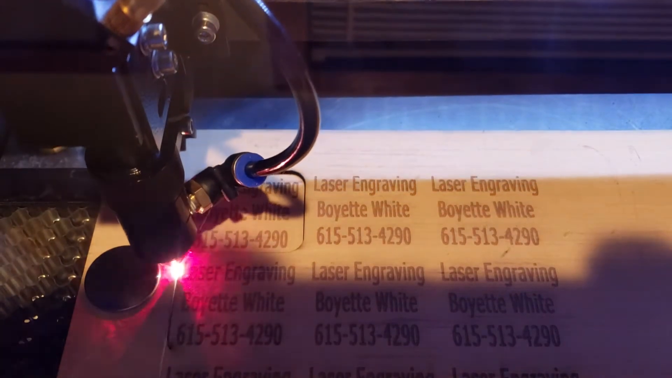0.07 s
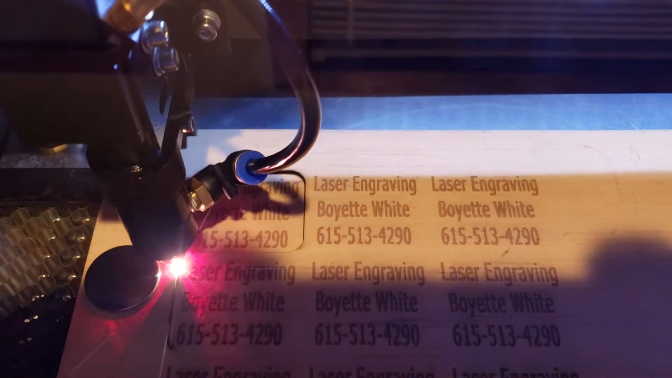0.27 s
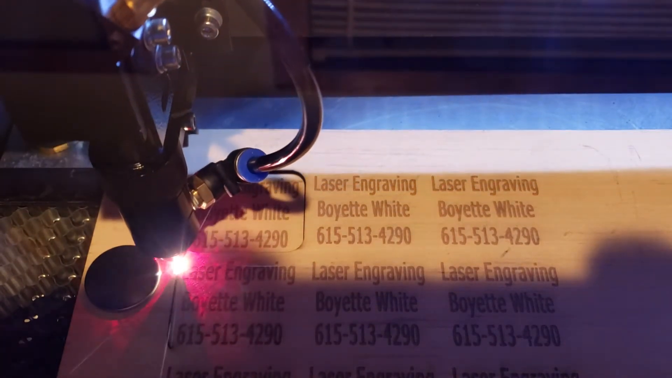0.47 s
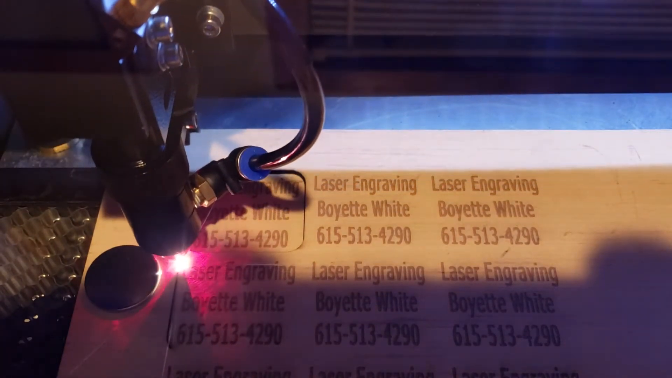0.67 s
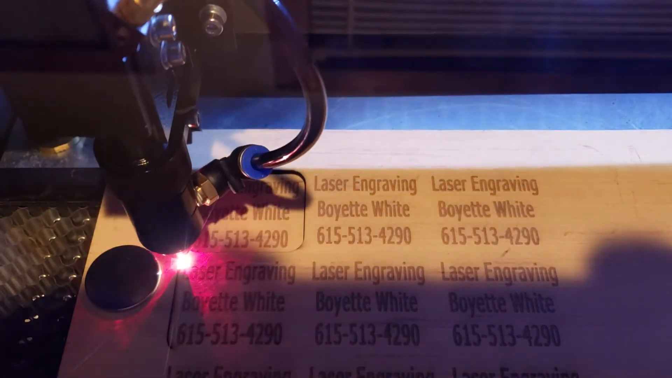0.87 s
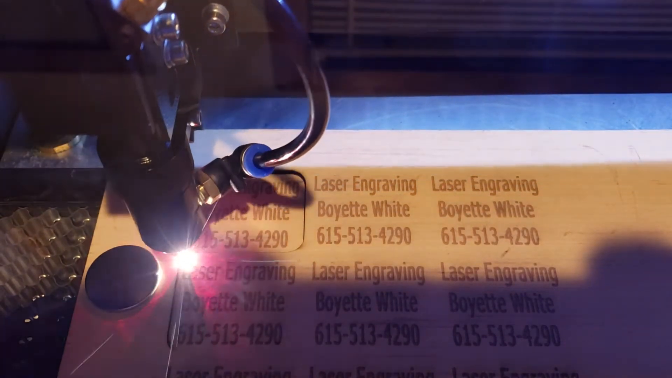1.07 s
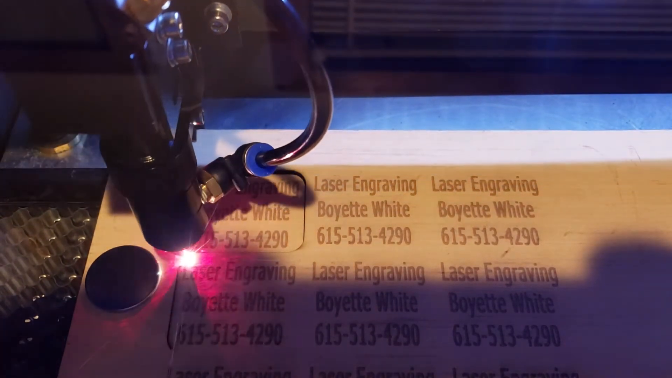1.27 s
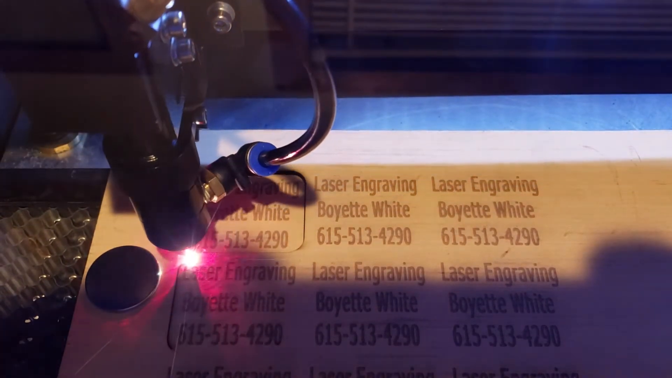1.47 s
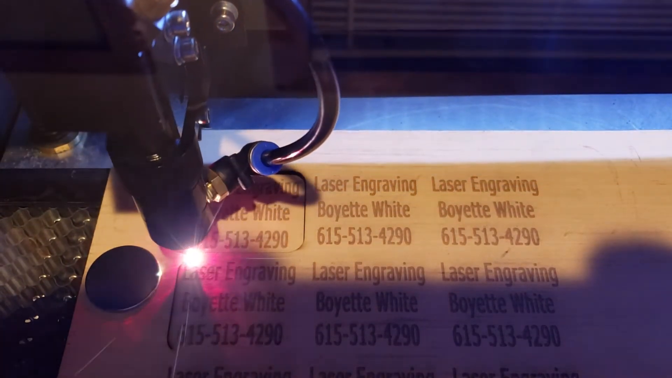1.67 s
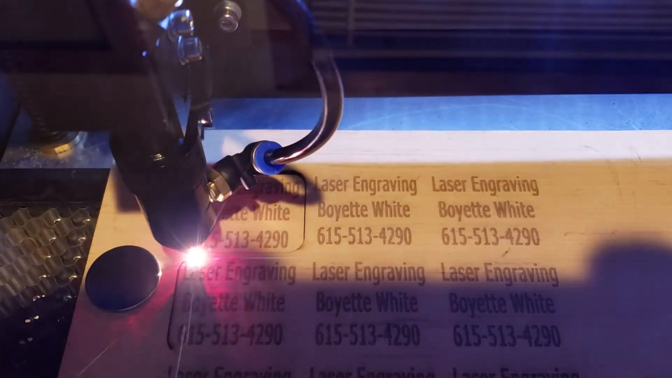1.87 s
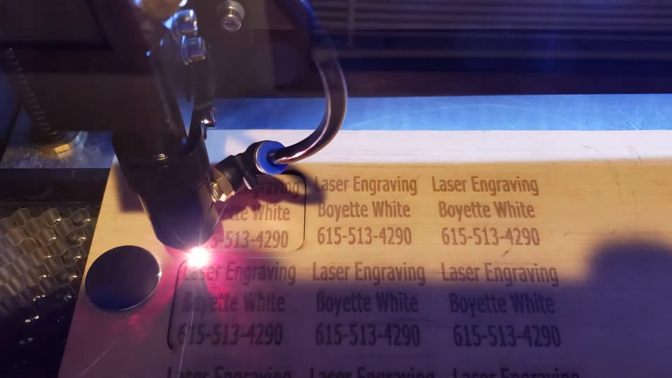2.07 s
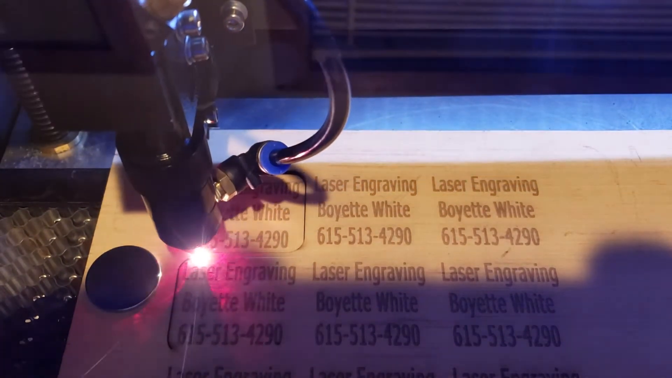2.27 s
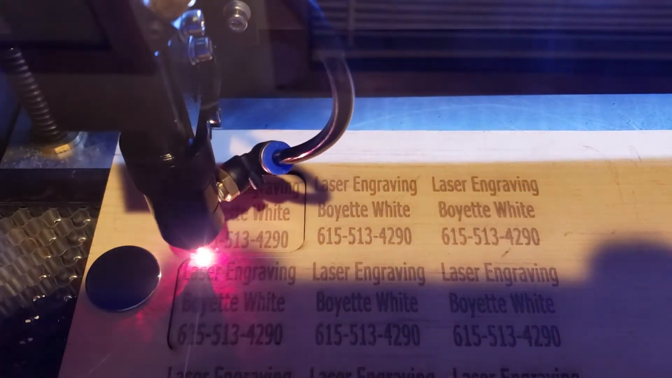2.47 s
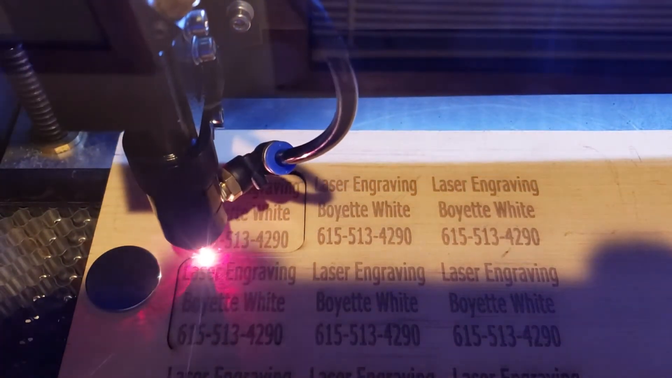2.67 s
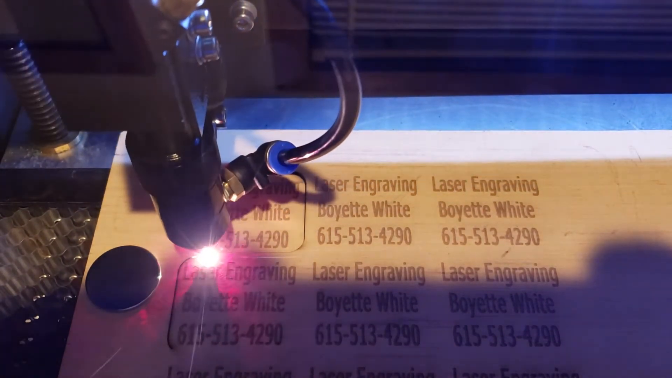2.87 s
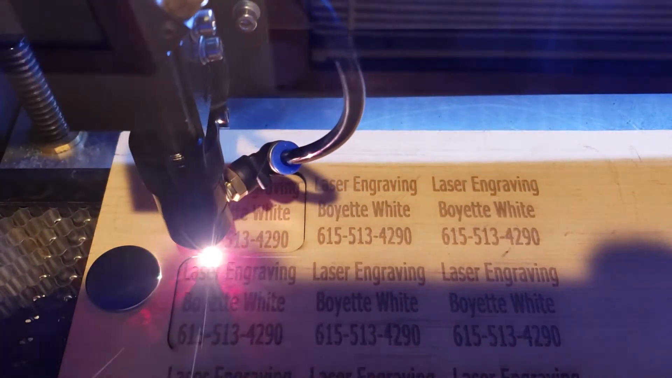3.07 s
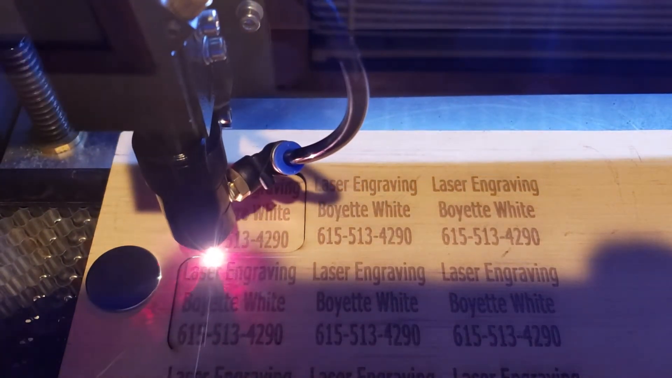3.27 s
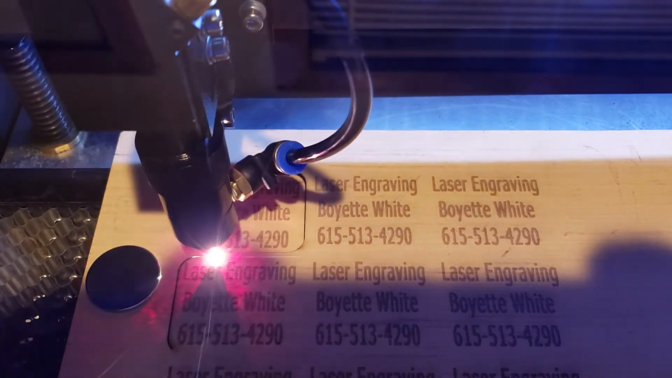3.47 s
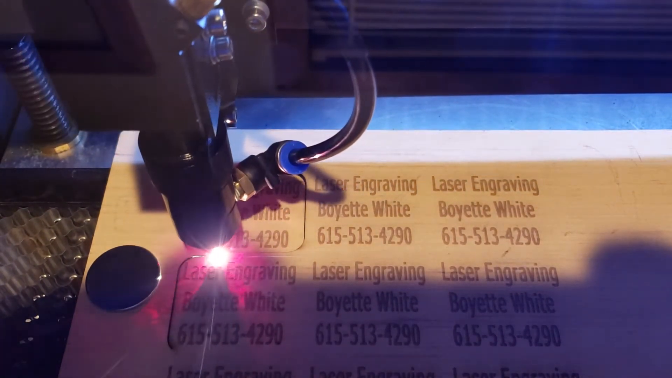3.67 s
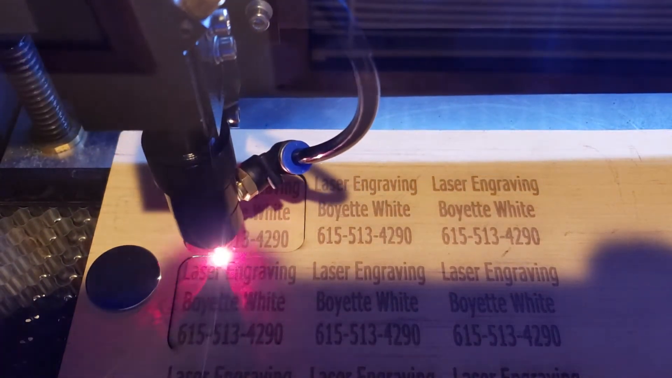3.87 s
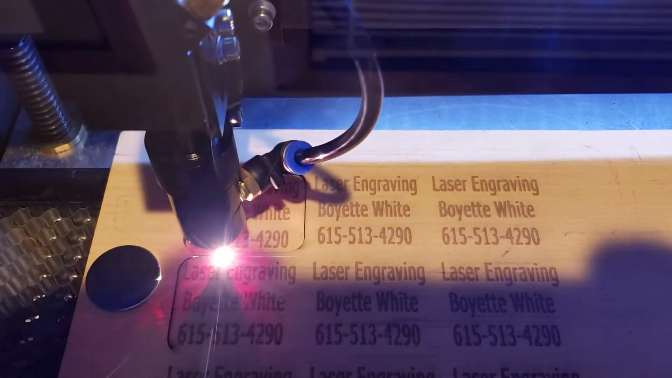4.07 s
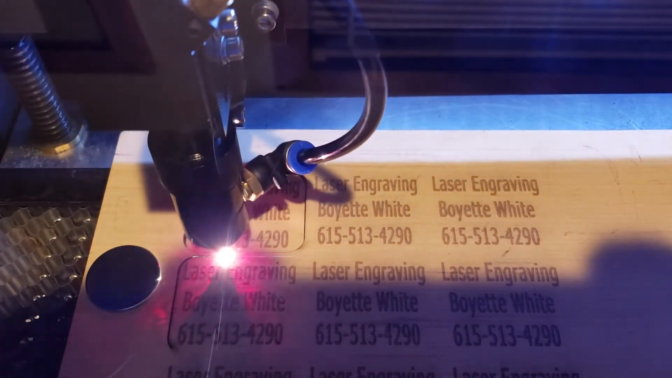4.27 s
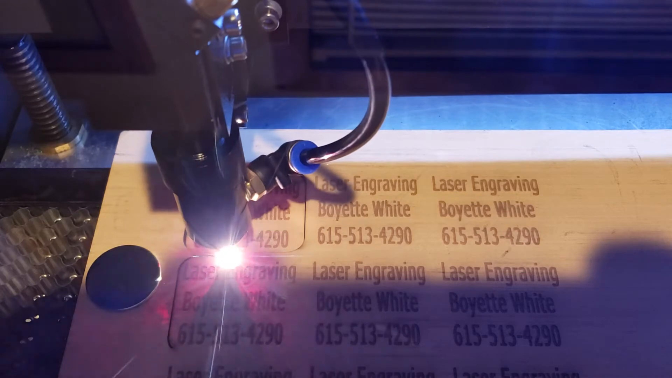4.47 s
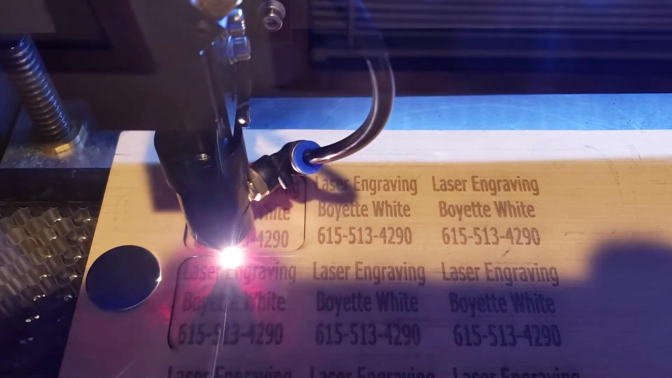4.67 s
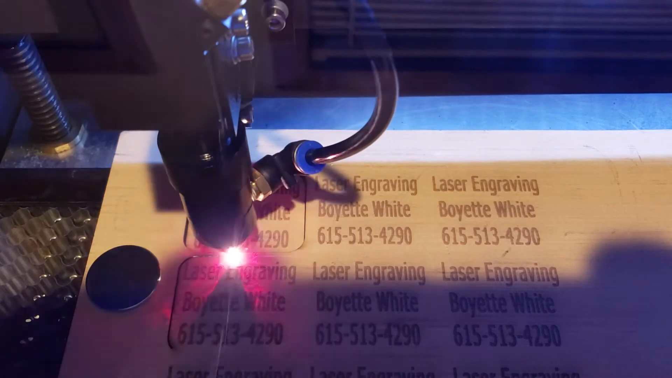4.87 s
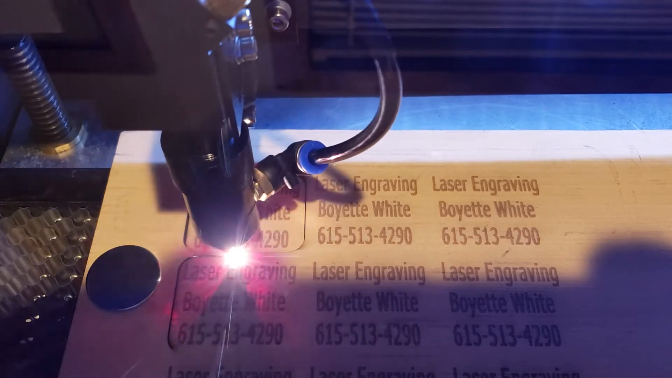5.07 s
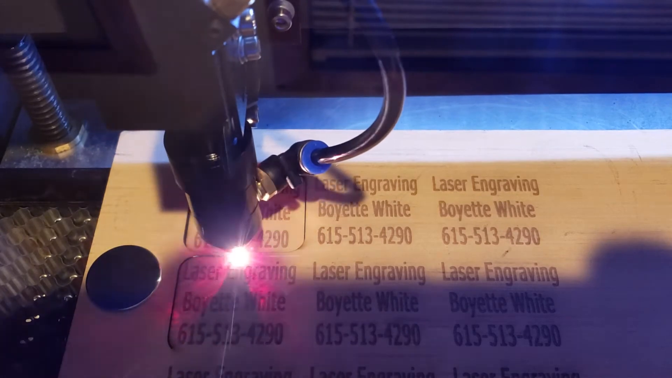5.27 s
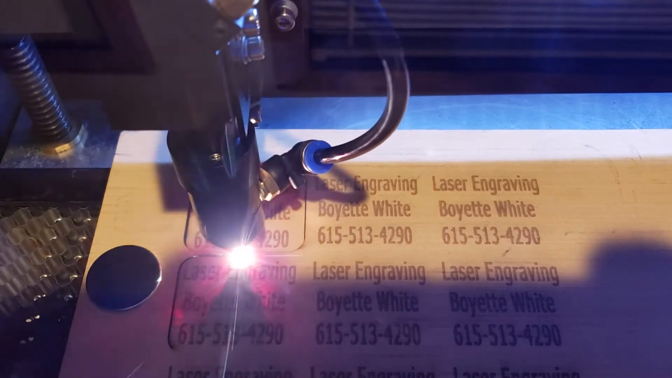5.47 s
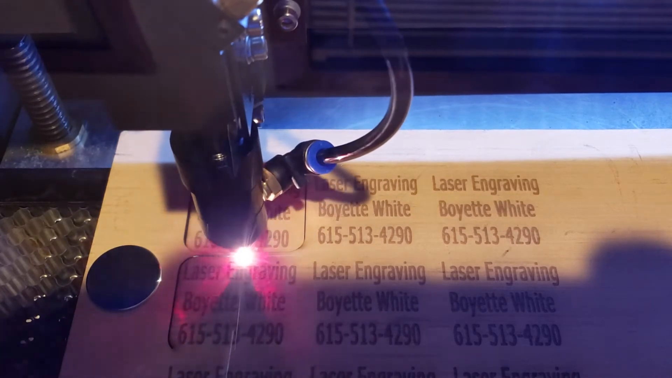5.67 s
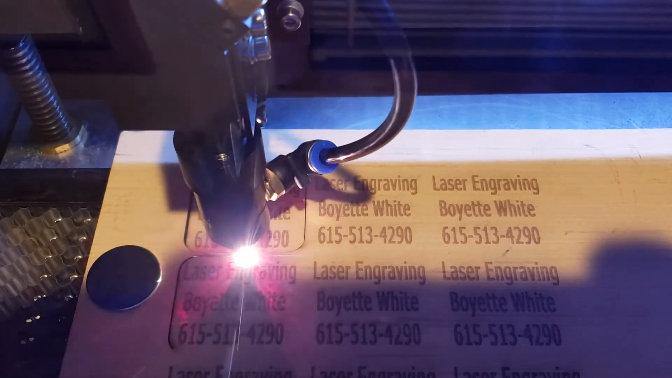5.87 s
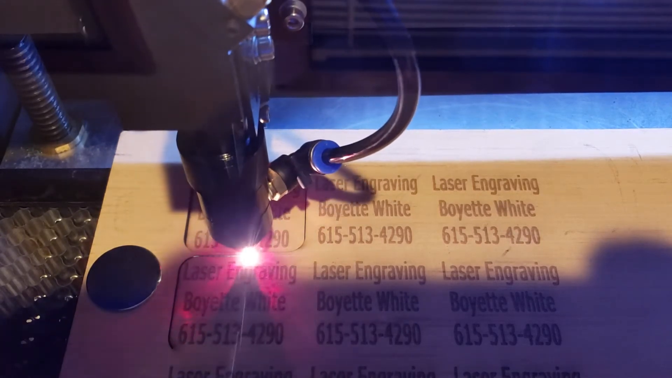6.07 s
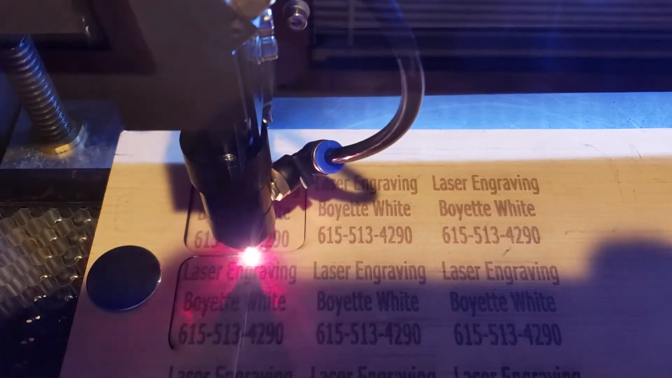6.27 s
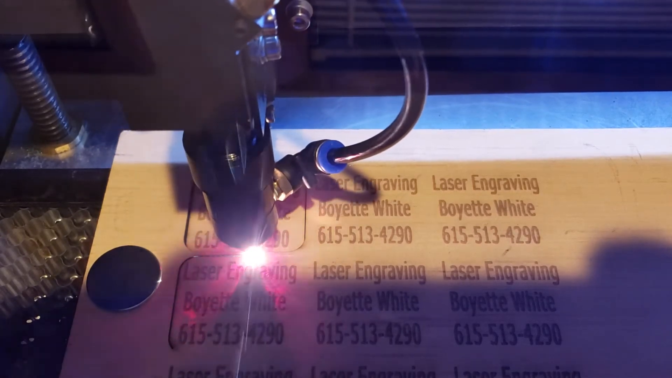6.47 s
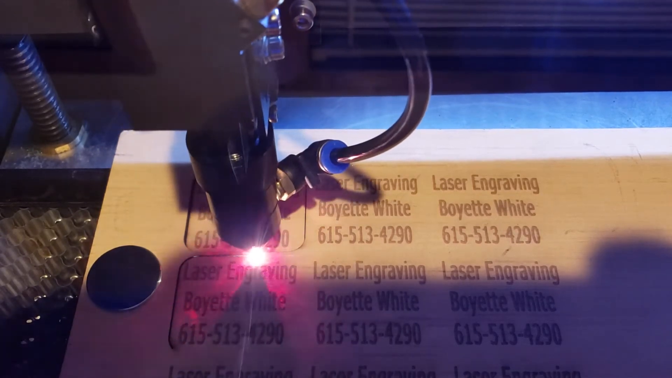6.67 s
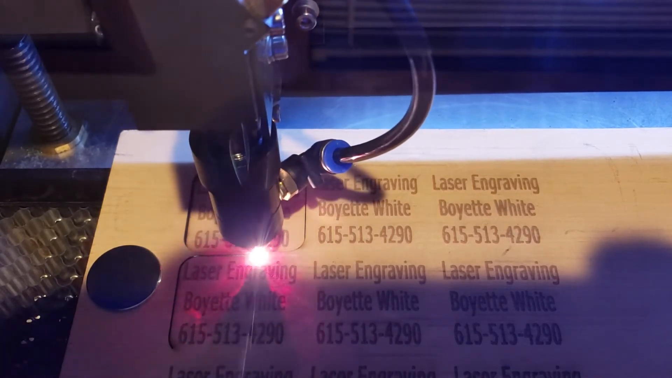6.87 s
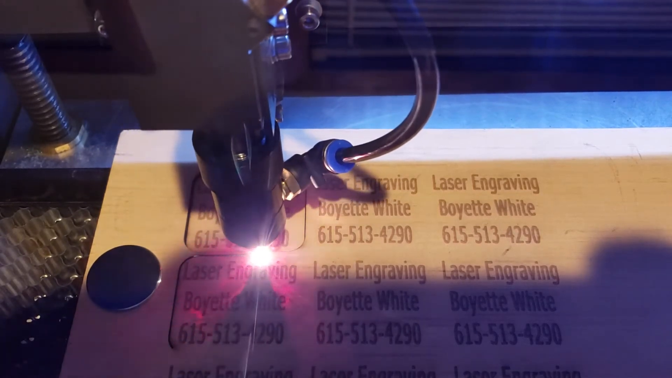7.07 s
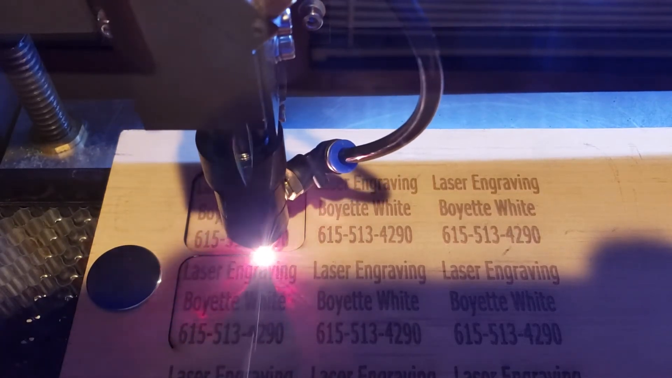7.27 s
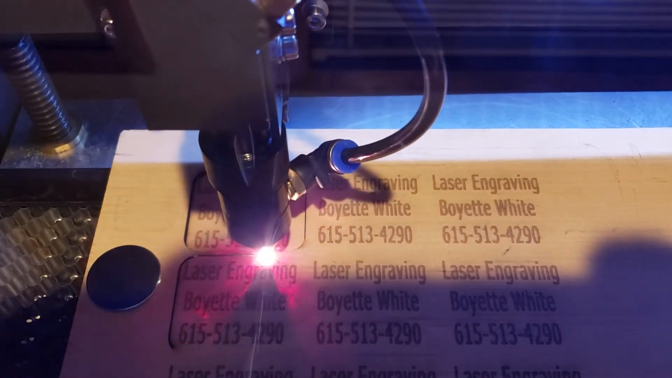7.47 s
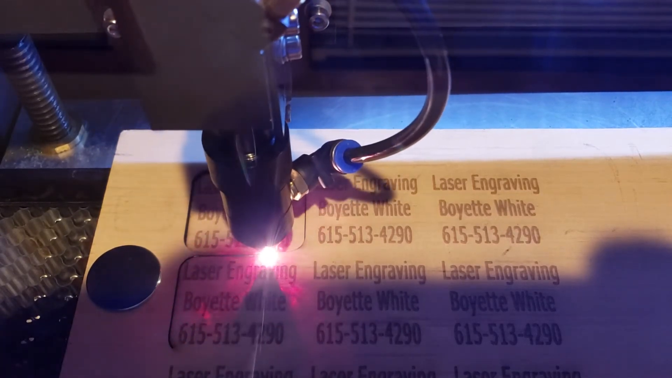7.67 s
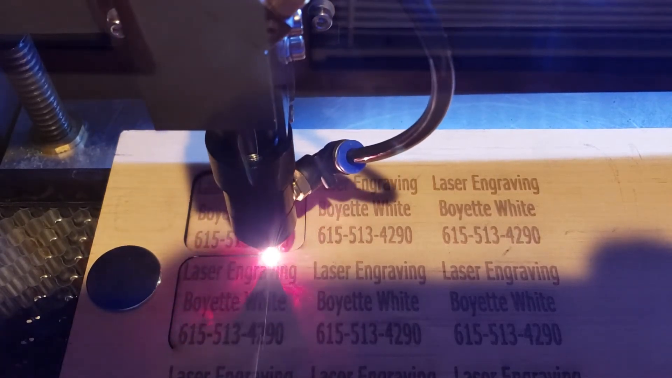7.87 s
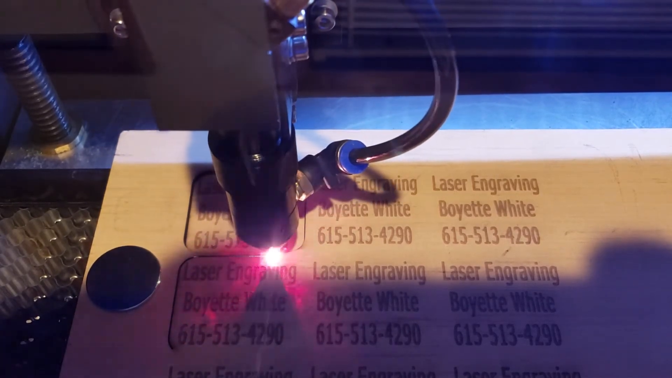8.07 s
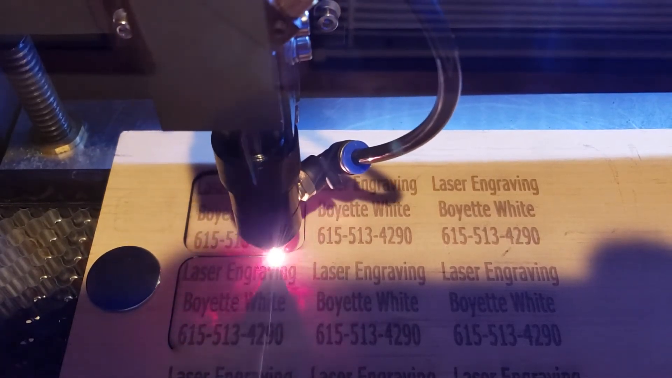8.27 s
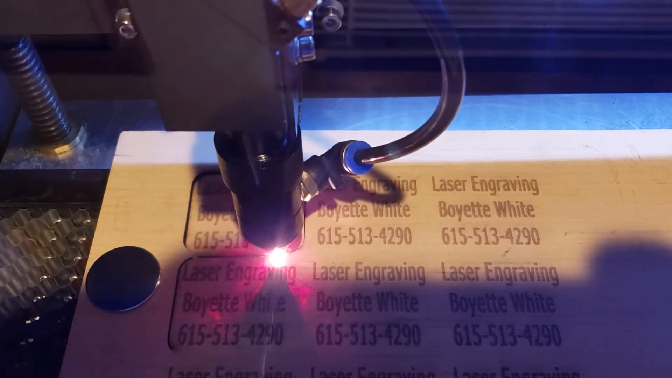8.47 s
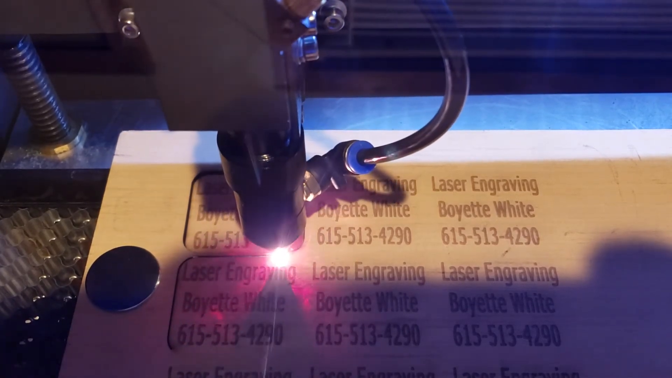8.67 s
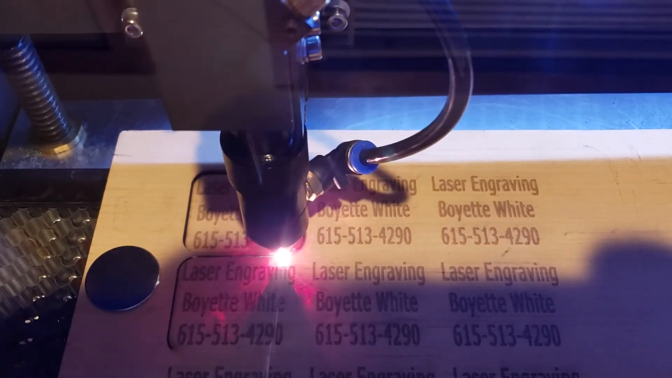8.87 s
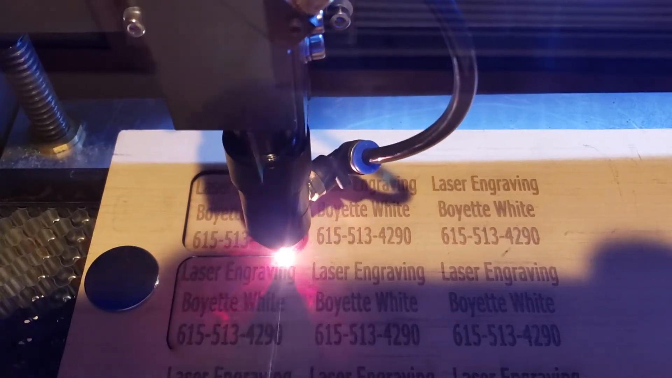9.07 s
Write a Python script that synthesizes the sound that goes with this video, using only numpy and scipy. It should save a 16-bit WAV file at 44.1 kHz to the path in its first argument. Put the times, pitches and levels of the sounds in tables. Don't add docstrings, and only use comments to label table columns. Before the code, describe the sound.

Inside a machine cabinet, broad fan rush and a low pump buzz run throughout. A braking stepper motor hums loudly downward with rattling and hand rumble, abruptly thinning when the stereo recorder lifts off the casing. A few dull thumps follow, then a second motor rises to a constant hum. Thin air whistle and sizzling hiss join at two seconds, fall away near eight, and surge sharply at the end.

```python
import sys
import numpy as np
from scipy import signal
from scipy.fft import rfft, irfft, next_fast_len
from scipy.io import wavfile
from scipy.ndimage import uniform_filter1d

SR = 44100
rng = np.random.default_rng(int(sys.argv[2]) if len(sys.argv) > 2 else 0)


def to_wav(sig):
    pcm = np.clip(np.atleast_2d(sig), -1, 1) * 32767
    pcm = np.round(pcm).astype(np.int16)
    wavfile.write(sys.argv[1], SR, pcm.T)


def voltage_ratio(level):
    return 10 ** (np.asarray(level, float) / 20)


N = 401751
SECONDS = np.arange(N) / SR
SIZE = next_fast_len(N)
HZ = np.fft.rfftfreq(SIZE, 1 / SR) + 1e-3

# time [s], step rate [Hz], pressure on the casing [dB].
SLOWING = [
    (0, 166.5, -2),
    (.25, 162.5, 0),
    (.35, 159, 1),
    (.44, 155, 1),
    (.525, 151, -12),
    (.57, 149.5, -2),
    (.655, 147, -3),
    (.79, 130, 0),
    (1.12, 111, 0),
]
# centre [Hz], width [Hz], lift [dB].
GANTRY = [(299, 16, 6), (260, 7, 10), (249, 6, 15), (230, 5, 13)]
# multiple of the step rate, left [dB], right [dB], left lead [rad].
STEP_ORDERS = [(1, -46, -46, 2.3), (2, -31, -38, -.45), (3, -50, -53, .01), (4, -49, -50, .12),
               (5, -64, -64, -1.7), (7, -73, -64, -1.8), (8, -69, -70, .4), (13, -76, -76, -2.5)]
# centre [Hz], width [Hz], level [dB].
NOZZLE = [(10660, 60, -8), (11150, 50, -13), (11380, 60, -8), (11570, 70, -7), (11800, 110, -5.5),
          (12070, 70, -5), (12200, 120, -10), (12370, 90, -14), (12630, 60, -13), (13700, 60, -17),
          (11970, 800, -10)]
# start [s], duration of the change [s].
STAGES = [
    (1.88, .16),
    (8.1, 0.27),
    (8.88, 0.12),
    (9.02, 0.022),
]
# idle, cutting, clear, flare and break-through levels [dB].
JET_DB = [
    (-71, -63.5, -81, -54, -58),
    (-77, -62.5, -76, -57, -42),
    (-76, -60, -71, -54, -58),
]
# frequency [Hz], level [dB].
RATTLE_COLOUR = [(700, -17), (1500, 1.5), (2500, -7), (4500, -13), (6000, -15), (6900, -16.5), (7350, -9.5),
                 (7800, -17.5), (10500, -38), (11500, -17.5), (13000, -16), (14000, -27), (16000, -30)]
# centre [Hz], width [Hz], level [dB].
FRAME = [(60, 30, -11), (116, 24, 2), (210, 26, -1.5), (247.6, 25, -3.5), (279.4, 4, -2), (335, 55, -6)]
# start [s], length [s], grip on the left side [dB], deep sway [dB].
HANDLING = [
    (-.1, .76, -28.5, -44),
    (.7, 0.41, -35.5, -44),
    (1.5, 0.19, -46, -35),
    (1.9, 0.29, -46, -44),
]
# start [s], pitch [Hz], peak [dB], t60 [s], left-right [dB].
BUMPS = [(.7, 90, -26, .1, 8), (1.07, 255, -28, .2, 4), (1.11, 298, -26, .25, 2), (1.135, 95, -18, .1, 2),
         (1.28, 238, -22, .3, 1.5), (1.28, 150, -25, .2, 5), (1.47, 245, -29, .2, 3),
         (1.61, 240, -28, .35, -3), (1.785, 150, -22, .1, 6)]
# frequency [Hz], density [dB per Hz].
RUSH = [(13, -44), (22, -51), (53, -8.5), (139, -12.5), (278, -6), (337, -7), (408, -11), (670, -11.5),
        (748, -15.5), (1070, -19.5), (3140, -36), (4020, -41), (6780, -47.5), (11800, -46.5), (15900, -49)]
# centre [Hz], width [Hz], lift [dB].
CABINET = [(20, 18, 14), (55, 30, 0.5), (310, 95, -2), (404, 73, -3), (553, 108, 5.5), (662, 12.5, 5),
           (689, 26.4, 8), (838, 45, 5), (846, 19, -3.5), (980, 37, 3.5), (1526, 260, 3), (1592, 58, -6.5),
           (1815, 185, 5), (2383, 245, 5), (3150, 150, -1.5), (3760, 120, 4), (3950, 170, 8.5),
           (4210, 190, 5.5), (6300, 90, 7), (7340, 250, 8.5)]
# frequency [Hz], correlation [-1 to 1].
LIKENESS = [(60, 0.91), (130, 0.37), (290, 0.54), (640, 1), (1410, 0.019), (3100, 0.29), (6820, 0.29),
            (15000, -0.38)]
# frequency [Hz], left-right [dB].
SIDEDNESS = [(60, -5), (110, -7), (200, -8), (380, 2.5), (700, 0), (1290, 0.5), (2380, -1.0), (4400, -3),
             (8120, -7), (15000, -8.5)]
# frequency [Hz], left [dB], right [dB], left lead [rad].
FAN_TONES = [(45.5, -50, -46, 0.1), (91.0, -59, -50, 0.3), (153.2, -56, -65, 1.1), (254.8, -50, -47, -0.6),
             (272.9, -50, -50, 0.7), (287.1, -54, -55, -0.3), (291.0, -55, -58, 0.1),
             (305.7, -45, -50, -0.2), (342.0, -49, -58, 0.1), (356.7, -47, -55, 0.6),
             (6394.6, -89, -83, -2.2), (15612.9, -90, -79, -0.6)]
# multiple of the stroke rate, left
# [dB], right [dB], left lead [rad].
PUMP = [(1, -50, -44, 0.0), (2, -55, -43, 0.4), (3, -54, -41, 0.3), (4, -54, -44, 0.1), (5, -61, -54, 0.5),
        (6, -47, -42, -0.8), (7, -52, -49, -0.3), (9, -53, -51, -0.3), (11, -45, -46, 0.0),
        (12, -58, -59, -0.3), (13, -63, -62, 0.9), (18, -57, -64, -2.8), (19, -72, -59, -0.7),
        (20, -63, -75, -0.4), (21, -65, -73, -1.0), (25, -71, -63, -2.7), (29, -74, -69, -0.9),
        (30, -71, -67, 3.0), (32, -69, -67, -1.3), (33, -70, -70, -0.9), (34, -65, -84, 1.2),
        (35, -69, -65, -0.7), (37, -74, -70, -1.9), (39, -74, -74, 0.1), (66, -78, -71, -0.4),
        (67, -78, -70, -0.2), (68, -83, -82, 0.6)]
# frequency [Hz], level [dB].
WHINES = [(3095, -79), (5012, -83), (6395, -82), (7440, -85), (7617, -85)]
# centre [Hz], width [Hz], lift [dB].
PORTS = [(6630, 230, -2.5), (8230, 430, -4.5), (15550, 300, 3)]

LIFT_S, LIFT_TAKES_S = .655, .02
TOUCHING_DB, FREE_DB = (-19, -35, 22), (-45, -44, 2.5)
STOP_S = 1.1
START_S, START_HZ, FEED_HZ, SPEED_UP_S, SPEED_UP_TAKES_S = 1.26, 145, 166.6, 1.22, .8
KICK_DB, KICK_S, OFF_TUNE_DB, TUNE_WIDTH_HZ, TIRE_S, TIRE_DB = 14, 0.079, -11, 15, 7.8, -1.8
FIRST_EARLY_DB, FIRST_FULL_S = -8, 1.38
BED_HZ, BED_WIDTH_HZ, BED_DB = 154, 12, 10
JET_SWELL_DB, SWELL_S, SWELL_TAKES_S = (1.5, 0, .5), 2.1, 2.2
JET_SAG_DB_PER_S = (-.9, -1, -0.17)
RATTLE_DB, RATTLE_FREE_DB, JOLT_S, JOLT_DB, JOLT_KICK_DB, JOLT_TAU_S = -47.5, -69, 8.95, -44.5, 4.5, .02
STILL_GRIP_DB, STILL_SWAY_DB, HAND_ATTACK_S, HAND_RELEASE_S = -57, -59.5, 0.039, .06
RUSH_DB = -34
MAINS_HZ, SLIPPING_HZ = 60.01, 59.972
ECHO_SHARE, LEFT_LAG_S = .6, 7e-5
HELD_DB, FIRST_SLACK_DB, RECOVER_S, RECOVER_TAU_S, EASE_S, EASE_DB_PER_S = -5.5, 1.5, 2.75, 0.36, 7.36, -0.4
CUTOFF_HZ = 15740


def steppers():
    return slowing_motor() + feed_motor()


def slowing_motor():
    hz, pressure_db = in_time(SLOWING)
    free = ramp(LIFT_S, LIFT_TAKES_S)
    first_db, second_db, left_db = (near + (far - near) * free for near, far in zip(TOUCHING_DB, FREE_DB))
    lift_db = sum(db * hump(centre, width, 2 * hz) for centre, width, db in GANTRY)
    first_db = first_db + pressure_db + .25 * free * lift_db
    second_db = second_db + lift_db
    turns = np.cumsum(hz) / SR
    left_share = 1 / (1 + voltage_ratio(-left_db))
    shares = 2 * np.array([left_share, 1 - left_share])
    first = voltage_ratio(first_db) * shares * tone(turns, 0, 0, 0, wobble_db=0.2)
    right_loss_db = left_db * np.array([[0], [.45]])
    second = voltage_ratio(second_db - right_loss_db) * tone(2 * turns, 2, 0, 0, wobble_db=.8)
    return (first + second) * (1 - ramp(STOP_S, 0.024))


def feed_motor():
    hz = feed_hz()
    turns = np.cumsum(hz) / SR
    off_tune = 1 - 1 / (1 + (2 * (hz - FEED_HZ) / TUNE_WIDTH_HZ) ** 4)
    effort_db = OFF_TUNE_DB * off_tune + KICK_DB * (1 - ramp(START_S + KICK_S, .05))
    first, *higher = [tone(k * turns, *side, wobble_db=.4) for k, *side in STEP_ORDERS]
    bed_db = BED_DB * hump(BED_HZ, BED_WIDTH_HZ, hz)
    early_db = FIRST_EARLY_DB * (1 - ramp(FIRST_FULL_S, .12))
    song = voltage_ratio(bed_db + early_db) * first + voltage_ratio(effort_db) * sum(higher)
    return ramp(START_S, 0.037) * voltage_ratio(TIRE_DB * ramp(TIRE_S, .7)) * song


def feed_hz():
    return START_HZ + (FEED_HZ - START_HZ) * ramp(SPEED_UP_S, SPEED_UP_TAKES_S)


def jet():
    whistle_db, hiss_db, sizzle_db = map(through_cut, JET_DB, JET_SWELL_DB, JET_SAG_DB_PER_S)
    nozzle_power = sum(voltage_ratio(2 * db) * hump(hz, width) ** 2 for hz, width, db in NOZZLE)
    whistle = noise(np.sqrt(nozzle_power), 0, -2.0)
    hiss = noise(np.sqrt(hump(15500, 14000) * (1 - hump(0, 9000))), 0, -2.5)
    sizzle = noise(np.sqrt(hump(3100, 4600)) * (1 - hump(0, 5000)), 0, -2.2)
    strokes = .08 * np.sin(2 * np.pi * MAINS_HZ * SECONDS)
    steps = .07 * np.sin(4 * np.pi * np.cumsum(feed_hz()) / SR)
    sputter = voltage_ratio(.7 * drift(6.9) + 1.3 * drift(21)) * (1 + strokes + steps)
    return sputter * (voltage_ratio(whistle_db) * whistle + voltage_ratio(hiss_db) * hiss + voltage_ratio(sizzle_db) * sizzle)


def through_cut(levels_db, swell_db, sag_db_per_s):
    level_db, cutting_db, *later_db = levels_db
    sag_db = sag_db_per_s * since(SWELL_S + SWELL_TAKES_S)
    cutting_db = cutting_db + swell_db * ramp(SWELL_S, SWELL_TAKES_S) + sag_db
    for db, stage in zip([cutting_db, *later_db], STAGES):
        level_db = level_db + (db - level_db) * ramp(*stage)
    return level_db


def casing():
    steps = 1 + 0.11 * np.sin(2 * np.pi * np.cumsum(in_time(SLOWING)[0]) / SR)
    colour = voltage_ratio(at_hz(RATTLE_COLOUR, HZ)) * (HZ > 600)
    buzz = noise(colour, 0.11, np.interp(HZ, [1500, 4500], [-1.5, -10]))
    grip, swing = handling()
    rumble = grip * noise(sum(voltage_ratio(db) * hump(hz, width) for hz, width, db in FRAME), 0.65, 11.0)
    sway = swing * noise(hump(70, 45), 0.88, -7.0)
    return voltage_ratio(rattle_db() + 0.73 * drift(9.2)) * steps * buzz + rumble + sway


def rattle_db():
    level_db = RATTLE_DB + (RATTLE_FREE_DB - RATTLE_DB) * ramp(LIFT_S, LIFT_TAKES_S)
    jolt_db = JOLT_DB + JOLT_KICK_DB * np.exp(-since(JOLT_S + .025) / JOLT_TAU_S)
    return level_db + (jolt_db - level_db) * ramp(JOLT_S, 0.03)


def handling():
    grip, sway = voltage_ratio(STILL_GRIP_DB), voltage_ratio(STILL_SWAY_DB)
    for s, length, grip_db, sway_db in HANDLING:
        busy = ramp(s, HAND_ATTACK_S) * (1 - ramp(s + length, HAND_RELEASE_S))
        grip = grip + voltage_ratio(grip_db) * busy
        sway = sway + voltage_ratio(sway_db) * busy
    return grip, sway


def bumps():
    out = np.zeros((2, N))
    for s, hz, db, t60, left_db in BUMPS:
        age = since(s)
        envelope = voltage_ratio(db - 60 * age / t60) * (1 - np.exp(-age / 0.0071))
        ring = envelope * np.sin(2 * np.pi * hz * age)
        out += ring * voltage_ratio(np.array([[left_db / 2], [-left_db / 2]]))
    return out


def fans():
    colour = voltage_ratio(at_hz(RUSH, HZ) + sum(db * hump(hz, width) for hz, width, db in CABINET))
    rush = noise(colour, at_hz(LIKENESS, HZ), at_hz(SIDEDNESS, HZ))
    lows, under_highs = (signal.sosfiltfilt(signal.butter(2, hz, fs=SR, output="sos"), rush)
                         for hz in (850, 2700))
    middles, highs = under_highs - lows, rush - under_highs
    gusts = lows * voltage_ratio(1.1 * drift(3.8)) + middles * voltage_ratio(1.9 * drift(16)) + highs * voltage_ratio(0.75 * drift(12))
    blades = sum(tone(hz * SECONDS, *side, wobble_db=0.0) for hz, *side in FAN_TONES)
    return voltage_ratio(RUSH_DB) * gusts + blades


def pump():
    buzz = np.zeros((2, N))
    for k, *side in PUMP:
        stroke_hz = MAINS_HZ if k < 30 else SLIPPING_HZ
        buzz += tone(k * stroke_hz * SECONDS, *side, wobble_db=1.2)
    return buzz


def whines():
    return sum(tone(hz * SECONDS, db - 4, db + .5, rng.uniform(-1, 1), wobble_db=2.5) for hz, db in WHINES)


def tone(turns, left_db, right_db, lead, wobble_db):
    phase = 2 * np.pi * (turns + rng.random()) + np.array([[lead / 2], [-lead / 2]])
    level_db = np.array([[left_db], [right_db]]) + wobble_db * drift(5.4)
    return np.sqrt(2) * voltage_ratio(level_db) * np.sin(phase)


def noise(gain, alike, left_db):
    mid, side, shared = rfft(rng.standard_normal((3, SIZE)))
    alike = np.clip(alike, -1, 1)
    pair = np.sqrt(1 + alike) * mid + np.sqrt(1 - alike) * side * [[1], [-1]]
    share = ECHO_SHARE * (1 - hump(0, 1170)) ** 4
    pair = np.sqrt(1 - share) * pair + np.sqrt(2 * share) * shared * np.array([echoes(), echoes()])
    left = voltage_ratio(left_db / 2) * np.exp(-2j * np.pi * HZ * LEFT_LAG_S)
    right = voltage_ratio(-left_db / 2) + 0 * HZ
    return rms_one(irfft(gain * pair * [left, right], SIZE)[:, :N])


def echoes():
    lags, walls = rng.uniform(0, .014, 30), np.zeros(SIZE)
    walls[(lags * SR).astype(int)] = rng.normal(0, 1, 30) * voltage_ratio(-500 * lags)
    response = rfft(walls)
    return response / np.sqrt(uniform_filter1d(np.abs(response) ** 2, size=2500))


def hump(centre_hz, width_hz, hz=HZ):
    return 1 / (1 + (2 * (hz - centre_hz) / width_hz) ** 2)


def drift(rate):
    r = np.exp(-80 * np.pi * rate / SR)
    slow = signal.lfilter([1], [1, -2 * r, r * r], rng.standard_normal(N // 40 + 2002))[2000:]
    return np.interp(np.arange(N) / 40, np.arange(len(slow)), rms_one(slow))


def rms_one(x):
    return x / np.sqrt(np.mean(x ** 2) + 1e-20)


def in_time(rows):
    s, *columns = np.transpose(rows)
    return [np.interp(SECONDS, s, c) for c in columns]


def at_hz(points, hz):
    point_hz, values = np.transpose(points)
    return np.interp(np.log(hz), np.log(point_hz), values)


def ramp(start_s, takes_s):
    return .5 - .5 * np.cos(np.pi * np.clip((SECONDS - start_s) / takes_s, 0, 1))


def since(start_s):
    return np.maximum(SECONDS - start_s, 0)


def scene():
    return steppers() + jet() + casing() + bumps() + fans() + pump() + whines()


def gain_db():
    slack_db = FIRST_SLACK_DB * (1 - ramp(0, LIFT_S))
    return HELD_DB * np.exp(-since(RECOVER_S) / RECOVER_TAU_S) + slack_db + EASE_DB_PER_S * since(EASE_S)


def band_limit(x):
    return signal.sosfilt(signal.butter(12, 16080, fs=SR, output="sos"), x)


def record(dry):
    colour = voltage_ratio(sum(db * hump(hz, width) for hz, width, db in PORTS))
    colour = colour * np.where(HZ < CUTOFF_HZ, 1, .007)
    mix = irfft(rfft(dry * voltage_ratio(gain_db()), SIZE) * colour, SIZE)[:, :N]
    return band_limit(mix)


dry = scene()
out = record(dry)
to_wav(out)
```